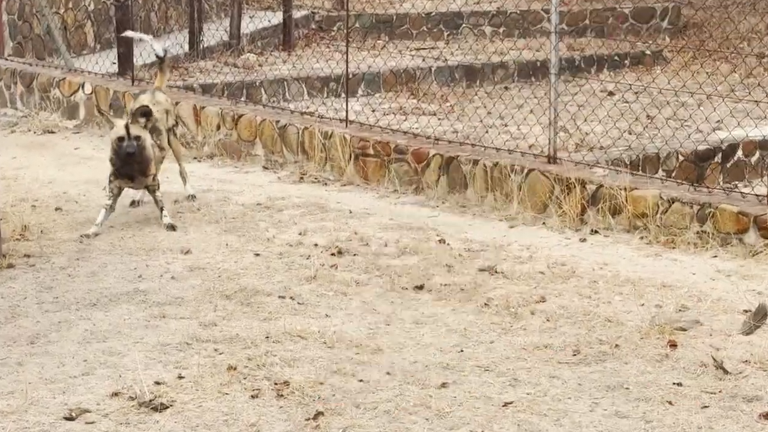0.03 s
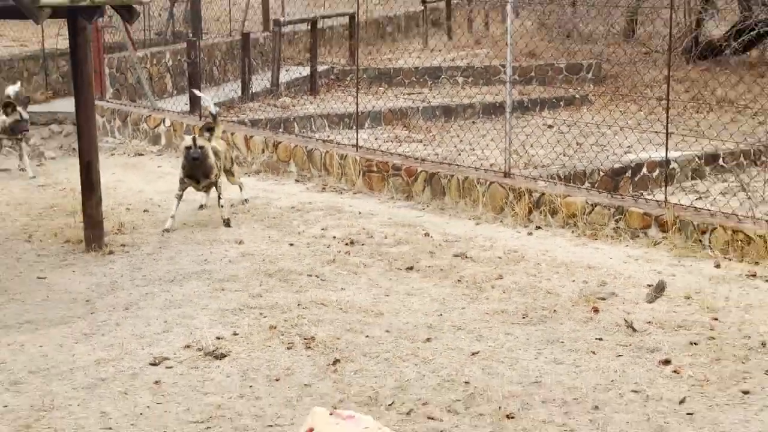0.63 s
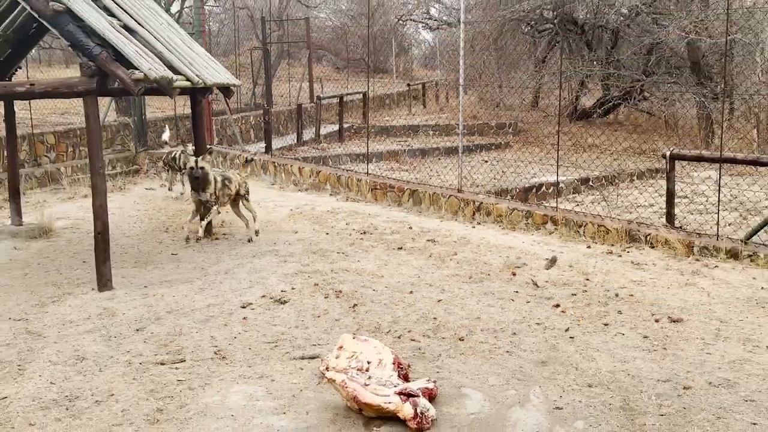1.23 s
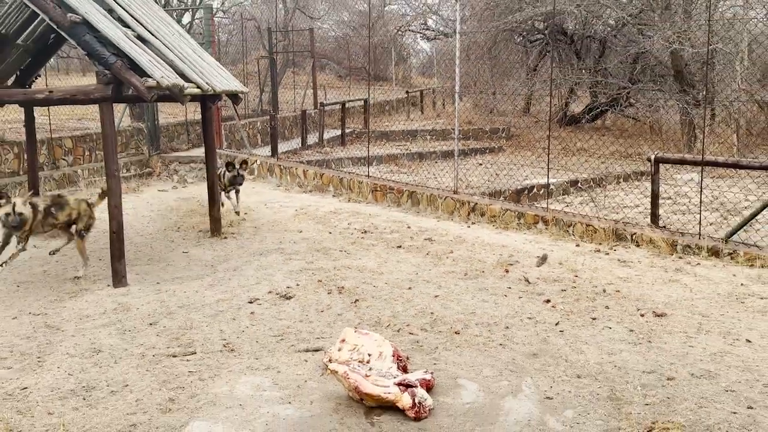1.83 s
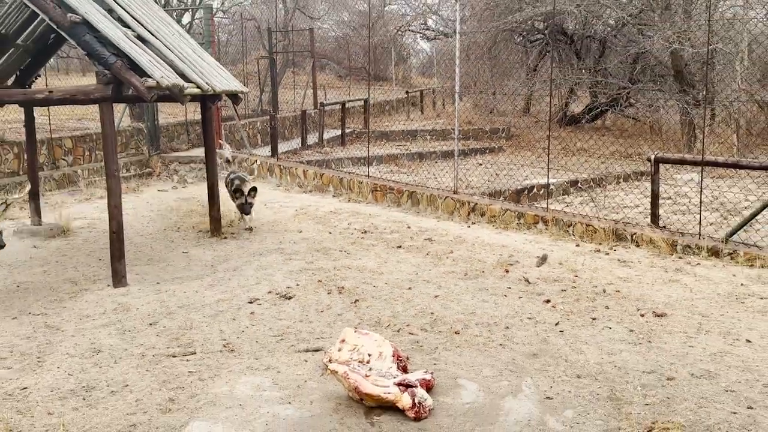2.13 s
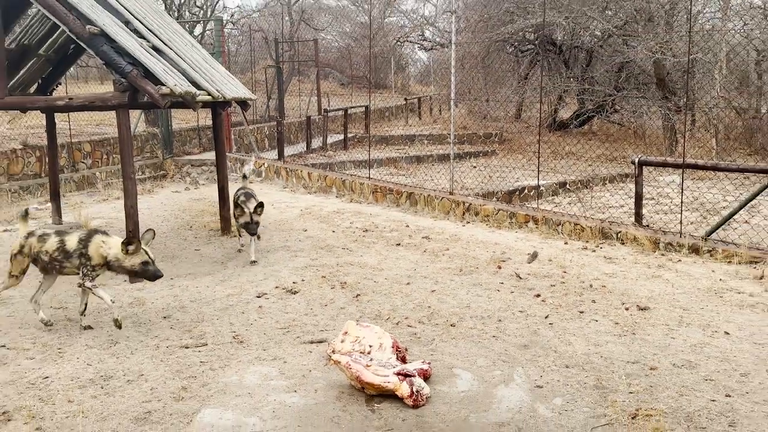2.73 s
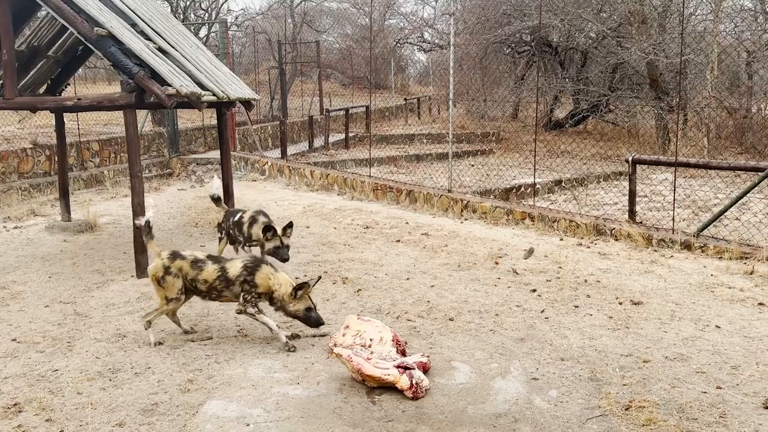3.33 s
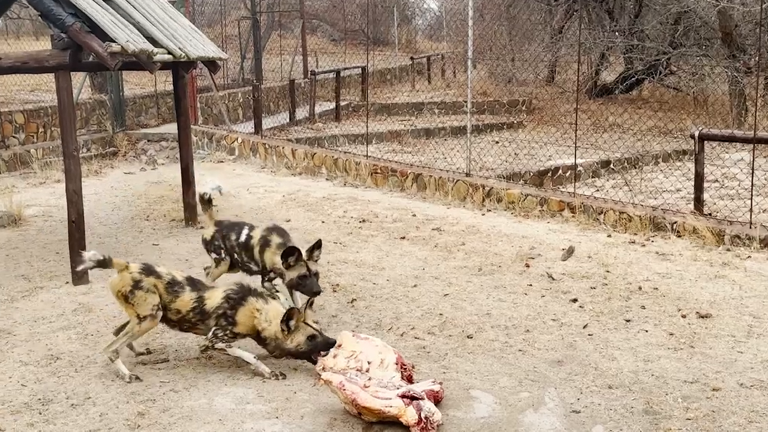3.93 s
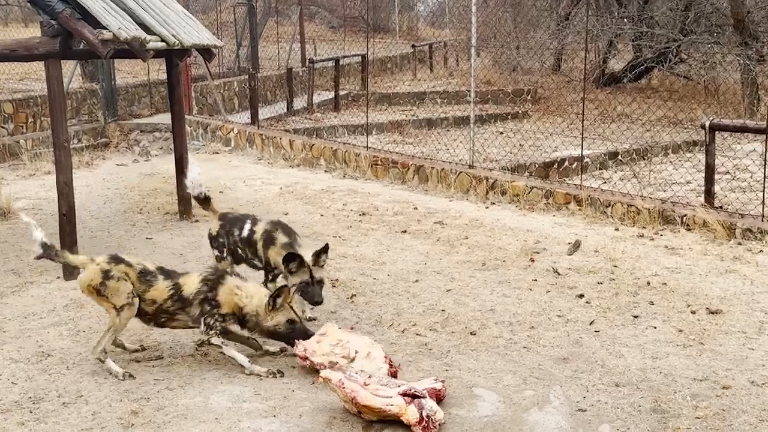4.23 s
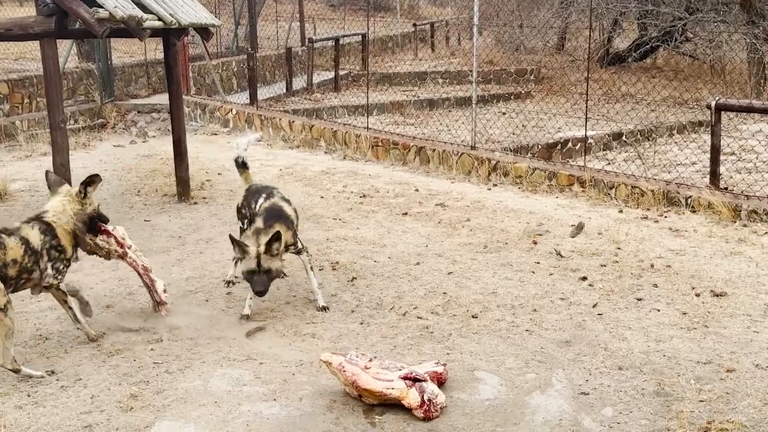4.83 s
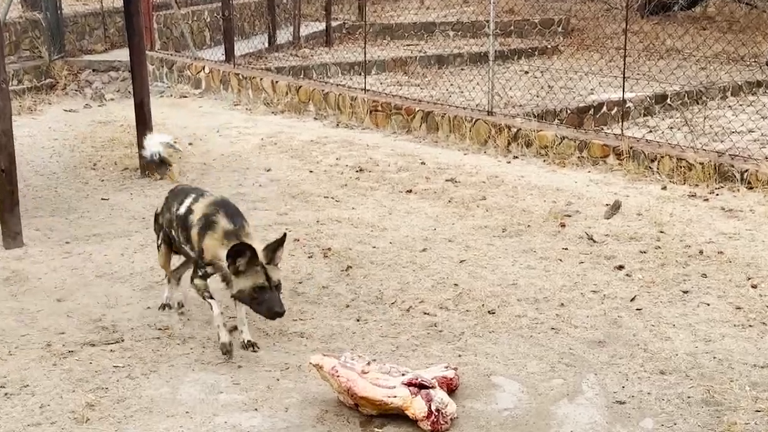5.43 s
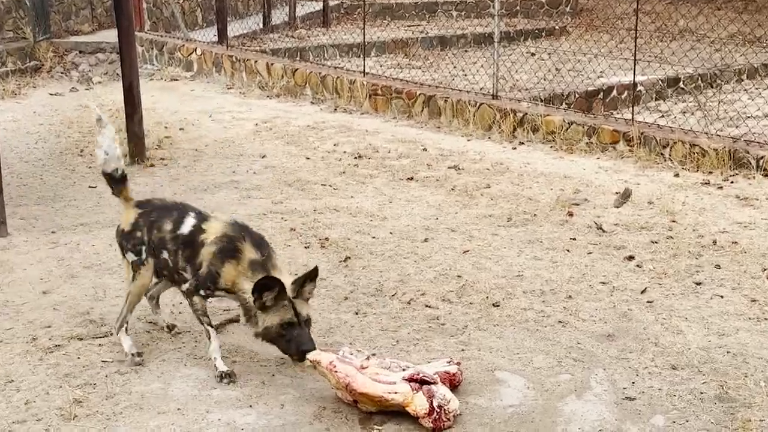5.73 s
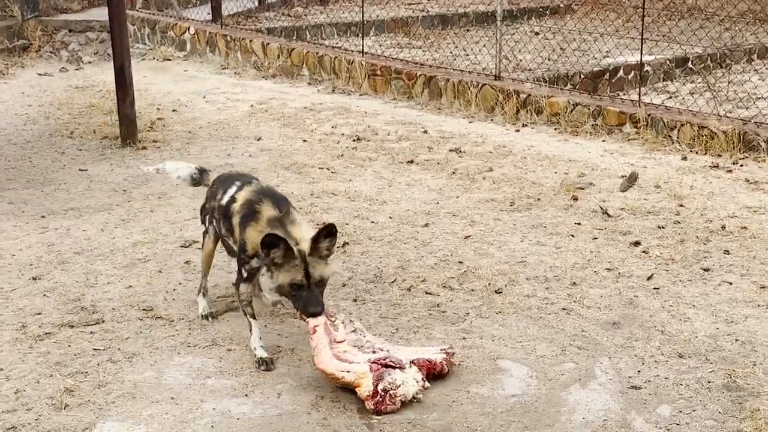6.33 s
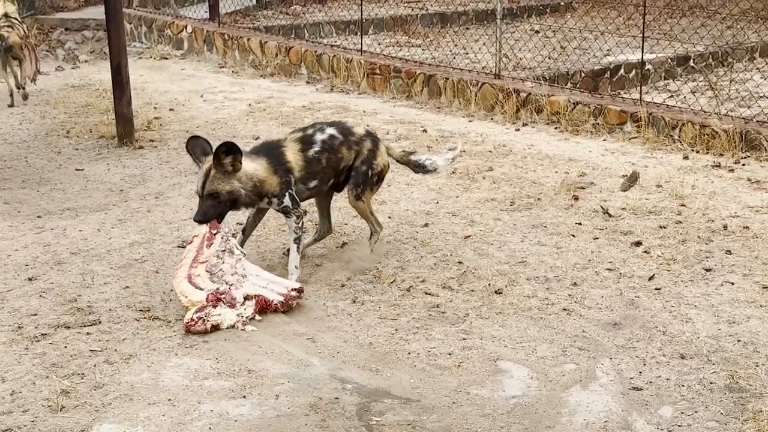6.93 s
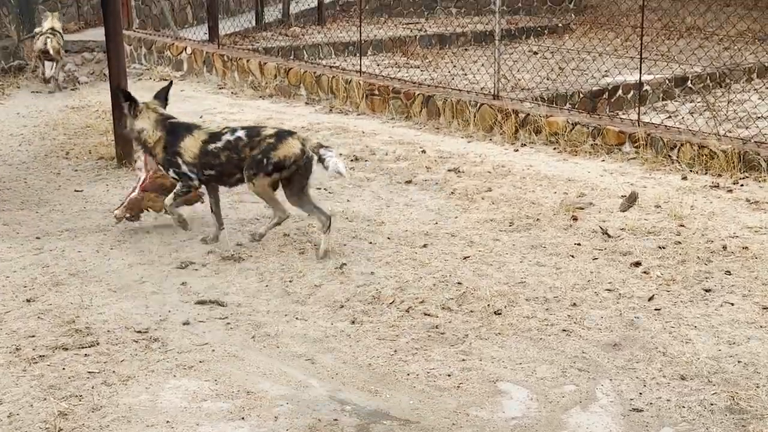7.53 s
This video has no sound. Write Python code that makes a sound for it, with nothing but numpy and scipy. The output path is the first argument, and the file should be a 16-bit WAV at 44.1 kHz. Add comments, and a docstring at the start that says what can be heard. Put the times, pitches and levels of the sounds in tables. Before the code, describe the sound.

In a sandy outdoor pen, wild dogs twitter in quick clusters of thin, very high, gliding chirps and wavering squeals, with one faint low yelp and a slight echo. The calls stop after about three seconds. Soft paw scuffs, hissing sand and small pebble clicks follow as meat is dragged twice over the ground. Wind rumbles and thumps on the hand-held microphone throughout, strongest at the start and the end.

```python
"""A sandy outdoor pen: African wild dogs trot up to a piece of meat, tug at it and drag it off.
They twitter in thin, gliding whistles, with one low yelp, and the pen echoes their calls.
Paws and meat scrape over the grit, making sand hiss and pebbles click. Gusts of wind rumble
and thump on a hand-held microphone, over a faint hush of open air."""
import sys
import numpy as np
from scipy import signal
from scipy.fft import rfft, irfft, next_fast_len
from scipy.io import wavfile
from scipy.ndimage import uniform_filter1d

SR = 44100
rng = np.random.default_rng(int(sys.argv[2]) if len(sys.argv) > 2 else 0)


def dump_mix(stems):
    """Bounce the given channels to the path in sys.argv[1] as a 16-bit WAV at rate SR."""
    frames = np.atleast_2d(stems).T  # one column per channel
    limited = np.clip(frames, -1, 1)  # hard clip at full scale
    pcm = np.round(limited * 32767).astype(np.int16)
    wavfile.write(sys.argv[1], SR, pcm)


N = 338247
TIME = np.arange(N) / SR
CUTOFF_HZ = 15700


def from_db(db):
    """Turn decibels into a number to multiply a sound by."""
    return 10 ** (np.asarray(db) / 20)


def rms_one(x):
    """Scale a signal so that its average size (rms) is 1."""
    return x / np.sqrt(np.mean(x ** 2) + 1e-20)


def in_time(rows):
    """Join timed points with straight lines: one curve for each column after the time."""
    times, *columns = np.transpose(rows)
    return [np.interp(TIME, times, column) for column in columns]


def at_hz(points, hz):
    """Read a table of (pitch, value) points at any pitch, with octaves evenly spaced."""
    pitches, values = np.transpose(points)
    return np.interp(np.log(hz), np.log(pitches), values)


def add(out, start_s, sound):
    """Mix a sound in at a given time."""
    start = int(start_s * SR)
    out[..., start:start + sound.shape[-1]] += sound[..., :N - start]


def drift(rate_hz):
    """A smooth random wobble of size about 1; a higher rate wobbles faster."""
    memory = np.exp(-40 * np.pi * rate_hz / SR)
    noise = rng.standard_normal(N // 20 + 2002)   # one value per 20 samples, plus a run-up
    slow = signal.lfilter([1], [1, -2 * memory, memory * memory], noise)[2000:]
    return np.interp(np.arange(N) / 20, np.arange(len(slow)), rms_one(slow))


def envelope(hold_s, attack_s, release_s):
    """A loudness shape that rises, holds, then dies away."""
    t = np.arange(0, attack_s + hold_s + 8 * release_s, 1 / SR)
    return np.minimum(t / attack_s, 1) * np.exp(-np.maximum(t - attack_s - hold_s, 0) / release_s)


def resonate(x, hz, width_hz):
    """Keep only the part of a sound near one pitch."""
    edges = np.clip([hz - width_hz / 2, hz + width_hz / 2], 30, SR * .45)
    return signal.sosfilt(signal.butter(2, edges, "band", fs=SR, output="sos"), x)


def noise_bands(spectrum):
    """Split stereo noise with a given tone into half-octave bands: (middle pitch, sound)."""
    # how alike left and right are (1 = the same): pitch_hz, likeness
    likeness = [(50, 0.68), (125, 0.67), (250, 0.98), (1000, 0.26), (2500, 0.95), (5000, 1), (8000, 0.96),
                (15000, 1)]
    edges = spectrum[0][0] * 2 ** np.arange(-.5, 11, .5)
    edges = edges[edges < min(spectrum[-1][0] * 2, SR / 2)]
    centres = np.sqrt(edges[1:] * edges[:-1])
    gains = from_db(at_hz(spectrum, centres))
    gains = gains / np.sqrt(np.sum(gains ** 2 * np.diff(edges)) / (SR / 2))
    white = rng.standard_normal((2, 2, N))
    for k, hz in enumerate(centres):
        band_filter = signal.butter(2, edges[k:k + 2], "band", fs=SR, output="sos")
        mid, side = signal.sosfilt(band_filter, white[k % 2])
        alike = np.clip(at_hz(likeness, hz), -1, 1)
        apart = np.sqrt((1 - alike) / 2) * np.array([side, -side])
        yield hz, gains[k] * (np.sqrt((1 + alike) / 2) * mid + apart)


def coloured(spectrum):
    """Stereo noise of size about 1; the spectrum sets only its balance of low and high."""
    return sum(band for hz, band in noise_bands(spectrum))


def swells(rows, gain_db, grain_db):
    """Patches of grainy noise, each swelling and fading around its own pitch."""
    out = np.zeros(N)
    grains = rms_one(from_db(grain_db * drift(120))) * rng.standard_normal(N)
    for middle_s, length_s, hz, width_hz, db in rows:
        start = max(int((middle_s - length_s / 2) * SR), 0)
        span = slice(start, int((middle_s + length_s / 2) * SR))
        swell = np.cos(np.pi * (TIME[span] - middle_s) / length_s)
        out[span] += from_db(db + gain_db) * swell * rms_one(resonate(grains[span], hz, width_hz))
    return out


def still_air(level_db):
    """The air around the pen makes a faint, steady hush."""
    # tone of the hush: pitch_hz, relative_db
    air_tone = [(30, -1), (75, -5), (250, -17), (600, -13), (1500, -25.5), (3900, -66), (8000, -28),
                (11000, -64), (15500, -54)]
    return from_db(level_db) * coloured(air_tone)


def wind_strength(attack_s, release_s):
    """How hard the wind blows at each moment, in dB: a breeze with gusts on top."""
    # the breeze between gusts: time_s, level_db
    breeze = [(0, -33.5), (1.1, -49), (1.27, -50.5), (1.4, -45), (1.72, -66), (1.95, -51), (2.28, -52.5),
              (2.6, -50.5), (2.75, -64), (3.55, -69), (4.1, -53), (4.7, -43), (5.35, -54), (5.65, -73),
              (6.0, -66), (6.4, -46.5), (7.0, -41.5), (7.67, -35)]
    # gusts on the microphone: start_s, length_s, level_db
    gusts = [(0.043, 0.18, -32), (0.298, 0.027, -30.5), (.43, 0.13, -32), (0.652, .12, -39.5),
             (.815, 0.075, -31.5), (0.874, 0.19, -39.5), (1.1, 0.021, -37.5), (1.524, 0.089, -45),
             (1.675, 0.0086, -47.5), (1.755, 0.02, -43.5), (1.9, 0.056, -50), (1.992, 0.046, -37),
             (2.196, .05, -47), (2.408, .12, -40.5), (2.581, 0.032, -41), (2.812, .02, -53.5),
             (3.157, 0.017, -49), (3.276, 0.022, -51), (3.645, 0.031, -47), (3.75, .28, -40.5),
             (4.165, 0.11, -36.5), (4.328, 0.14, -42), (4.834, 0.12, -34.5), (4.935, 0.096, -37),
             (5.114, .16, -41), (5.432, .03, -42.5), (5.539, 0.016, -45), (5.635, 0.014, -46.5),
             (5.72, 0.087, -59), (6.054, 0.019, -44.5), (6.212, 0.056, -37.5), (6.324, 0.4, -38.5),
             (6.81, 0.026, -38), (7.06, 0.49, -32.5)]
    power = from_db(in_time(breeze)[0]) ** 2
    for start_s, length_s, db in gusts:
        gust = from_db(db) * envelope(length_s, attack_s, release_s)
        add(power, max(start_s - attack_s, 0), gust ** 2)
    return 10 * np.log10(power)


def wind(strength_db, unrest_db, dull_db, lump_db, treble_lump_db):
    """Air swirls at the microphone's openings with a lumpy roar; light air only rumbles."""
    # tone of the wind: pitch_hz, relative_db
    wind_tone = [(20, -24.5), (35, -10), (55, 7), (80, 5), (130, 0.5), (220, -6), (400, -22), (600, -38.5),
                 (850, -64), (1300, -74)]
    calm = np.clip((-37 - strength_db) / 20, 0, 1)
    lumps = 2 * np.tanh(drift(35) / 2)
    roar = 0
    for hz, band in noise_bands(wind_tone):
        treble = np.clip(np.log2(hz / 100) / 2, 0, 1)
        roar += band * from_db((lump_db + treble_lump_db * treble) * lumps - dull_db * treble * calm)
    # even out the roar, so that its tone does not change its level
    power = uniform_filter1d(np.mean(roar ** 2, axis=0), size=3000)
    return from_db(strength_db + unrest_db * drift(10.2)) * roar / np.sqrt(power + 1e-12)


def eddy(start_hz, rise_s, end_hz, fall, turn, skew, churn=0.348):
    """One swirl of air (an eddy) thumps, getting deeper as it spreads over the microphone."""
    t = np.arange(int(SR / 10)) / SR
    knots = np.arange(0, t[-1], rise_s / 3)
    stir, shake = [np.interp(t, knots, row) for row in rng.standard_normal((2, len(knots)))]
    falling_hz = end_hz + (start_hz - end_hz) * np.exp(-t / (fall * rise_s))
    hz = falling_hz * np.exp(churn * (1.34 * np.tanh(stir) - churn))
    phase = 2 * np.pi * (np.cumsum(hz) / SR + turn)
    swell = (t / rise_s * np.exp(1 - t / rise_s)) ** 2 * (1 + churn * shake)
    return swell * np.sin(phase + 0.21 * skew * np.array([[1], [-1]]))   # skew parts left from right


def buffets(end_hz, fall):
    """Big eddies slap the microphone one by one."""
    # the slaps: start_s, level_db, start_hz, rise_s
    slaps = [(0.043, -23, 710, 0.0029), (.079, -24.5, 960, 0.0033), (0.129, -23, 403, 0.0061),
             (0.192, -30, 342, 0.0087), (0.298, -27, 246, 0.02), (.319, -32, 850, .0023),
             (0.339, -24, 880, 0.0027), (0.434, -19, 695, 0.0024), (0.458, -19.5, 685, 0.0018),
             (.521, -19, 760, 0.0013), (.546, -23, 655, .0031), (0.635, -31, 1030, 0.0036),
             (.664, -26, 805, 0.003), (0.769, -27.5, 686, .0014), (0.825, -30, 655, 0.0026),
             (1.03, -35.5, 705, .005), (2.482, -29, 438, 0.0053), (4.03, -33, 860, .003),
             (4.824, -30.5, 538, 0.0078), (4.87, -25, 596, 0.0021), (4.955, -26.5, 604, .0046),
             (6.217, -29.5, 516, .004), (6.23, -18, 513, .0085), (6.326, -26.5, 583, 0.0077),
             (6.619, -23, 576, 0.0058), (6.83, -22.5, 472, .01), (7.08, -20.5, 804, 0.0042),
             (7.084, -15.5, 389, .0095), (7.168, -24.5, 857, .0075), (7.212, -26.5, 747, 0.0067),
             (7.266, -26, 540, 0.0072), (7.309, -23, 295, 0.0065), (7.448, -25, 418, 0.016),
             (7.543, -20, 513, 0.0062), (7.62, -27.5, 620, 0.0042)]
    out = np.zeros((2, N))
    for start_s, db, start_hz, rise_s in slaps:
        turn, skew = rng.standard_normal(2)
        add(out, start_s, from_db(db) * eddy(start_hz, rise_s, end_hz, fall, turn, skew))
    return out


def flurry(strength_db, gain_db, growth, top_hz, rise_s, spread_db, count):
    """Small eddies pop at random, and grow faster than the gust that carries them."""
    out = np.zeros((2, N))
    for k, (when, size, turn, skew, force) in enumerate(rng.random((count, 5))):
        start_s = (k + when) / count * (N - 1) / SR
        gust_db = strength_db[int(start_s * SR)]
        db = gust_db + gain_db + growth * min(gust_db + 35.5, 0) + spread_db * (force - .5)
        pop = eddy(top_hz * (1 - size / 2), rise_s * (1 + size),
                   end_hz=120, fall=1.85, turn=turn, skew=4 * skew - 2)
        add(out, start_s, from_db(db) * pop)
    return out


def friction(attack_s, release_s):
    """How strong the scrape and the sandy hiss are: trotting, dragging and short bursts together."""
    # grit stirring under trotting paws: time_s, scrape_db, sand_db
    patter = [(0, -50.5, -54.5), (.3, -69, -67), (1.1, -62, -61.5), (1.65, -69, -66.5), (2.1, -65.5, -62),
              (2.88, -69.5, -70), (3.2, -64.5, -62.5), (3.52, -68.5, -62), (5.2, -64, -62), (6.0, -70, -63),
              (7.67, -63, -62.5)]
    # the meat is dragged twice, one list each: time_s, scrape_db, sand_db
    hauls = [
        [(3.7, -63, -72), (3.82, -53.5, -65), (4.06, -60, -88), (4.33, -47.5, -57.5), (4.5, -48.5, -53.5),
         (4.63, -59.5, -61), (4.9, -70, -61), (5.2, -80, -85)],
        [(6.12, -65, -61), (6.22, -54.5, -57), (6.3, -57, -54.5), (6.42, -55, -49.5), (6.58, -60, -54),
         (6.69, -53, -47), (6.85, -59, -64), (7.05, -58.5, -57), (7.25, -104, -65)],
    ]
    # short bursts, from skids or from breath during the calls: start_s, length_s, scrape_db, hiss_db
    bursts = [(0, 0.11, -50.5, -59), (0.553, 0.15, -53, -52.5), (1.351, 0.075, -53.5, -64),
              (1.753, 0.013, -63, -51.5), (1.87, 0.097, -55, -54.5), (1.988, 0.043, -57.5, -57),
              (2.175, 0.036, -61.5, -58), (2.335, 0.016, -60, -55), (3.014, 0.11, -58, -64.5),
              (3.243, 0.032, -73, -64), (3.397, 0.057, -54.5, -50.5), (3.586, 0.046, -56.5, -51.5),
              (3.718, 0.036, -56.5, -52), (4.111, 0.022, -50.5, -57), (4.421, 0.014, -47, -47),
              (4.482, 0.057, -48, -61), (4.665, 0.022, -54.5, -61), (4.745, 0.09, -54.5, -52),
              (5.114, .015, -59.5, -70), (5.332, 0.055, -58.5, -63.5), (5.515, 0.083, -54.5, -50),
              (5.666, 0.096, -63.5, -61), (5.853, 0.0095, -56, -59), (5.935, 0.061, -60, -65),
              (6.046, 0.014, -56.5, -55.5), (6.178, 0.032, -69, -45.5), (6.471, 0.013, -49.5, -45),
              (6.509, 0.014, -55, -40.5), (7.398, 0.023, -59, -56), (7.49, 0.021, -61, -54),
              (7.557, 0.0057, -56, -58)]
    power = from_db(in_time(patter)) ** 2
    for haul in hauls:
        dragging = (TIME > haul[0][0]) & (TIME < haul[-1][0])
        power += from_db(in_time(haul)) ** 2 * dragging
    for start_s, length_s, scrape_db, hiss_db in bursts:
        burst = from_db([[scrape_db], [hiss_db]]) * envelope(length_s, attack_s, release_s)
        add(power, max(start_s - attack_s, 0), burst ** 2)
    return np.sqrt(power)


def grit(per_s, spread_db, hz, width_hz):
    """Coarse grains crack at random, most of them small and a few large."""
    sizes = from_db(spread_db * np.minimum(rng.exponential(1, N), 4)) * rng.choice([-1, 1], N)
    cracks = sizes * (rng.random(N) < per_s / SR)
    return rms_one(resonate(cracks + 1e-18, hz, width_hz))


def scuffs(slip_db, grain_db, crunch_db):
    """Paws and meat stick, slip and crunch as sand tumbles; the same noise serves for puffs of breath."""
    # tone of scraped ground: pitch_hz, relative_db
    scrape_tone = [(250, 10), (600, 6), (1000, 5.5), (1600, 3.5), (2400, 0.5), (3500, -1), (6000, -14.5),
                   (9000, -21), (15000, -19.5)]
    # tone of loose sand: pitch_hz, relative_db
    sand_tone = [(1500, -15), (3000, -5.5), (5500, 0), (8000, 1), (11000, -0.5), (15000, 1)]
    scrape_level, sand_level = friction(attack_s=0.014, release_s=0.018)
    slips = slip_db * drift(20)
    scrape = coloured(scrape_tone) * rms_one(from_db(slips + grain_db / 2 * drift(350)))
    sand = coloured(sand_tone) * rms_one(from_db(slips + grain_db * drift(570)))
    crunch = from_db(crunch_db) * grit(per_s=260, spread_db=5.0, hz=2970, width_hz=4000)
    return scrape_level * (scrape + crunch) + sand_level * sand


def rubs():
    """Harder rubs and faint squeaks each ring around a pitch of their own."""
    # the rubs: middle_s, length_s, pitch_hz, width_hz, relative_db
    strokes = [(0.023, 0.12, 2020, 1280, -40), (3.686, 0.084, 1160, 250, -54.5),
               (4.134, 0.13, 1840, 920, -46), (4.207, 0.089, 1820, 700, -55), (4.384, 0.1, 830, 440, -43),
               (4.374, 0.13, 1460, 885, -43), (4.51, 0.17, 1190, 915, -45), (5.578, 0.085, 3300, 700, -46),
               (5.855, .025, 586, 500, -47.5), (5.92, 0.16, 1060, 400, -56.5), (6.62, 1, 1680, 785, -54.5),
               (6.602, 0.86, 3800, 2400, -54), (7.4, 0.044, 5170, 500, -55),
               (7.598, 0.032, 1130, 200, -52.5)]
    return swells(strokes, gain_db=-3, grain_db=5.5)


def pebbles(decay_s):
    """A kicked pebble clicks: a very short burst of noise around the pitch it rings at."""
    # pebbles and grit kicked up: start_s, peak_db, pitch_hz
    kicks = [(0.287, -46, 2080), (.456, -44.5, 1480), (1.2274, -38, 4190), (2.016, -48, 1600),
             (2.58, -37, 8140), (2.607, -42.5, 7850), (3.3962, -37.5, 6240), (3.734, -44, 3300),
             (4.124, -27.5, 1750), (4.4864, -26, 1310), (4.6698, -36.5, 1200), (5.5893, -36.5, 3330),
             (5.7528, -35.5, 6700), (5.7768, -35.5, 8550), (5.9696, -40.5, 6260), (6.0417, -45, 3380),
             (6.1997, -36, 5220), (6.4507, -36, 4200), (7.565, -38.5, 1190)]
    out, t = np.zeros(N), np.arange(int(SR / 20)) / SR
    for start_s, db, hz in kicks:
        burst = rng.standard_normal(len(t)) * np.exp(-t / decay_s)
        ring = signal.butter(1, [hz / 2, min(hz * 2, CUTOFF_HZ)], "band", fs=SR, output="sos")
        click = signal.sosfilt(ring, burst)
        add(out, start_s, from_db(db) * click / np.abs(click).max())
    return out


def pen_echo(sound, tail_db, fade_60db_s, early_db, early_s):
    """Ground, walls and bushes scatter a quick echo and a thin, longer tail."""
    t = np.arange(int(.7 * SR)) / SR
    decay = from_db(tail_db - 60 * t / fade_60db_s) + from_db(early_db) * np.exp(-t / early_s)
    mid, side = rng.standard_normal((2, len(t))) * decay * (t > .004) / np.sqrt(SR * .03)
    echoes = np.array([mid + 0.51 * side, mid - 0.51 * side])
    return signal.fftconvolve(np.atleast_2d(sound), echoes, axes=1)[:, :N]


def rasps():
    """The dogs' voices rasp huskily beneath their whistles."""
    # the rasps: middle_s, length_s, pitch_hz, width_hz, relative_db
    husky_notes = [(.57, 0.083, 1550, 600, -52), (.635, 0.025, 1340, 400, -48),
                   (.69, 0.075, 1530, 448, -46.5), (.79, .08, 1490, 500, -52.5),
                   (.985, 0.18, 1410, 448, -53), (1.37, 0.2, 1280, 616, -52.5),
                   (1.85, 0.054, 1500, 1200, -61), (2.39, 0.039, 1840, 1154, -49),
                   (2.51, 0.13, 1560, 460, -52), (3.07, 0.32, 1240, 1100, -65)]
    return swells(husky_notes, gain_db=-1.5, grain_db=4)


def voicing(length_s, edge_s):
    """The clock of one call, and a gate that opens and closes it softly."""
    t = np.arange(-edge_s / 2, length_s + edge_s / 2, 1 / SR)
    opening = np.clip(np.minimum(t - t[0], t[-1] - t) / edge_s, 0, 1)
    return t, np.sin(np.pi / 2 * opening) ** 2


def yelp(jitter):
    """One short, low, rising note whose overtones are shaped by the throat."""
    # path of the yelp: time_s, pitch_hz, level_db
    path = [(1.862, 391, -50), (1.878, 414, -47), (1.895, 480, -47.5), (1.912, 516, -42),
            (1.925, 590, -48.5), (1.936, 600, -54)]
    # how the throat and open mouth boost or weaken each pitch: pitch_hz, gain_db
    throat = [(400, -2.5), (600, 0.5), (1000, -12), (1550, -3), (2050, -2), (2600, -25), (4000, -31)]
    times, pitches, levels_db = np.transpose(path)
    t, gate = voicing(times[-1] - times[0], edge_s=0.0064)
    t = t + times[0]
    hz = uniform_filter1d(np.interp(t, times, pitches), size=200)
    level = gate * from_db(np.interp(t, times, levels_db))
    phase = 2 * np.pi * np.cumsum(hz * (1 + jitter * drift(196.5)[:len(hz)])) / SR
    voice = sum(from_db(at_hz(throat, k * hz)) * np.sin(k * phase) for k in range(1, 8))
    out = np.zeros(N)
    add(out, t[0], level * voice)
    return out


def chirps(settle):
    """Start, pitch and level of each chirp: most shoot up, round off and settle lower."""
    # the chirps: start_s, rise_s, fall_s, first_hz, top_hz, last_hz, first_db, top_db, last_db
    arches = [(0.507, 0.04, .022, 6600, 8270, 6100, -51, -52.5, -44),
              (.57, .02, .02, 6200, 6870, 6500, -49, -51, -50),
              (0.612, 0.021, 0.0087, 6300, 7100, 6930, -45, -40, -30),
              (.645, .013, 0.012, 4860, 6000, 6000, -44, -49, -44),
              (.664, 0.0026, 0.011, 7080, 6900, 5880, -47, -41, -33),
              (0.68, 0.0078, 0.039, 5970, 6930, 4420, -27, -39, -39.5),
              (.736, .016, 0.0032, 6630, 7950, 7850, -30, -32, -46),
              (.76, .014, 0.0338, 7860, 8540, 7930, -31.5, -27.5, -43),
              (0.921, 0.023, 0.0036, 5600, 7860, 8000, -41, -43, -41),
              (0.949, .003, 0.024, 8880, 8970, 8080, -33, -30, -33),
              (.975, 0.019, 0.0034, 7880, 8080, 8140, -31.5, -37, -36),
              (1.304, 0.0066, 0.0015, 6450, 7370, 7500, -48, -36, -35),
              (1.311, .019, .027, 7480, 8450, 7720, -27.5, -32.5, -28),
              (1.634, 0.013, 0.0035, 6200, 7600, 8000, -59, -63, -57),
              (1.801, .006, 0.0091, 6500, 6600, 6570, -51, -48, -44.5),
              (1.823, 0.0182, .028, 6600, 7840, 7050, -43, -39, -22),
              (1.874, 0.014, .003, 7100, 7840, 8000, -35.5, -44, -43),
              (1.912, 0.0074, 0.03, 6900, 6750, 5320, -41.5, -39, -34.5),
              (2.404, 0.01, .002, 4300, 6500, 6500, -40.5, -47, -44),
              (2.438, 0.024, 0.028, 6300, 7900, 5900, -49, -46, -35),
              (2.486, 0.014, .002, 5900, 7130, 7350, -38, -47, -48),
              (3.015, 0.0065, .002, 4570, 5240, 5350, -44, -54, -67)]
    for start_s, rise_s, fall_s, first_hz, top_hz, last_hz, *levels_db in arches:
        t, gate = voicing(rise_s + fall_s, edge_s=0.0065)
        up = np.sin(np.pi / 2 * np.clip(t / rise_s, 0, 1))
        down = np.sin(np.pi / 2 * np.clip((t - rise_s) / fall_s, 0, 1) ** settle) ** 2
        hz = first_hz + (top_hz - first_hz) * up + (last_hz - top_hz) * down
        db = np.interp(t, [0, rise_s, rise_s + fall_s], levels_db)
        yield start_s + t[0], hz, gate * from_db(db)


def squeals(waver_hz, waver_db):
    """Start, pitch and level of each squeal: it drops to a held note and swells on every waver."""
    # the squeals: start_s, length_s, first_hz, held_hz, slide_s, wavers_per_s, first_db, last_db
    slides = [(1.09, 0.037, 6200, 4920, 0.0072, 30.6, -48.5, -35.5),
              (1.126, 0.19, 4960, 4230, .013, 14.9, -39, -43.5),
              (2.326, 0.033, 5910, 4420, .005, 28, -43.5, -35),
              (2.36, 0.042, 4190, 3993, .006, 24.2, -49, -29.5),
              (2.99, 0.023, 6220, 4510, 0.011, 14, -53, -37.5)]
    for start_s, length_s, first_hz, held_hz, slide_s, wavers_per_s, *levels_db in slides:
        t, gate = voicing(length_s, edge_s=0.008)
        waver = np.cos(2 * np.pi * wavers_per_s * t)
        held = held_hz + waver_hz * waver
        hz = held + (first_hz - held) * np.exp(-np.maximum(t, 0) / slide_s)
        db = np.interp(t, [0, length_s], levels_db) + waver_db * waver
        yield start_s + t[0], hz, gate * from_db(db)


def twitters(husk, jitter, flutter_db, tremble_db, octave_db, third_db, hiss_db, crackle_db, breath_db):
    """Chirps and squeals run together as near-pure whistles, rougher and airier the higher they go."""
    # tone of the air forced out with each call: pitch_hz, relative_db
    breath_tone = [(400, 5.5), (1500, 1), (2800, -2), (5500, -3.5), (9000, -0.5), (15000, -7.5)]
    # tone of the bright hiss that follows each call's loudness: pitch_hz, relative_db
    hiss_tone = [(900, -12.0), (1600, -7.5), (2800, -44.0), (6000, 18.5), (9000, -2), (15000, 16.0)]
    whistles, effort, airflow = np.zeros((3, N))
    wobble, flutter, crackle, overtone, tremble = [drift(hz) for hz in (430, 117, 900, 100, 45)]
    for start_s, hz, level in [*chirps(settle=.8), *squeals(waver_hz=144, waver_db=2)]:
        span = slice(int(start_s * SR), int(start_s * SR) + len(hz))
        strain = hz / 7000
        phase = 2 * np.pi * np.cumsum(hz * (1 + jitter * strain * wobble[span])) / SR
        # the octave comes and goes, and changes less with effort than the main note
        octave = from_db(octave_db + 4.1 * overtone[span]) * np.sqrt(level) * np.sin(2 * phase)
        # only low notes carry a tone at three times their pitch
        third = from_db(third_db) * level * np.clip((5000 - hz) / 500, 0, 1) * np.sin(3 * phase)
        husky = 1 + husk * np.clip(1 - level / from_db(-34.5), 0, 1)   # soft notes break up more
        shake = from_db(flutter_db * strain * flutter[span] + tremble_db * tremble[span])
        rough = 1 + from_db(crackle_db) * strain * husky * crackle[span]
        add(whistles, start_s, np.sqrt(2) * shake * rough * (level * np.sin(phase) + octave + third))
        add(effort, start_s, level)
        add(airflow, start_s, level ** 0.4 * strain ** 2)
    hiss = from_db(hiss_db) * effort * coloured(hiss_tone)
    breath = from_db(breath_db) * airflow * coloured(breath_tone)
    return whistles + hiss + breath


def scene():
    """Mix the dogs' calls and scuffing with the wind and the open air."""
    voices = twitters(husk=2.2, jitter=0.013, flutter_db=3.5, tremble_db=1.5, octave_db=-33.5,
                      third_db=-28.5, hiss_db=-21.5, crackle_db=-20.5, breath_db=-39)
    voices += yelp(jitter=0.014) + rasps()
    voices = voices + pen_echo(voices, tail_db=-22, fade_60db_s=0.55, early_db=-6.5, early_s=.016)
    ground = rubs() + scuffs(slip_db=2, grain_db=2.0, crunch_db=-11) + pebbles(decay_s=0.0031)
    dogs = (voices + ground) * from_db([[0.2], [-0.2]])   # a touch to the left
    strength_db = wind_strength(attack_s=0.037, release_s=0.027)
    eddies = buffets(end_hz=100.3, fall=1.16)
    eddies += flurry(strength_db, gain_db=-5.5, growth=0.87, top_hz=898, rise_s=.003,
                     spread_db=1.0, count=420)
    thumps = signal.sosfilt(signal.butter(7, 830, fs=SR, output="sos"), eddies)   # keep them dull
    roar = wind(strength_db, unrest_db=2.0, dull_db=41, lump_db=3.0, treble_lump_db=-0.5)
    return dogs + roar + thumps + still_air(level_db=-60.5)


def record(dry):
    """Left and right are out of step, most of all in the treble; deep bass and top treble are cut."""
    # how far the left side runs ahead of the right: pitch_hz, lead_radians
    left_lead = [(0, 0), (250, -.45), (600, -.45), (1200, 0), (2800, .15), (3800, .5), (4600, .35),
                 (6300, 0), (7000, -.35), (7700, -.1), (8450, 0), (8900, -1.3), (9550, -3.14),
                 (11100, -6.28), (12650, -9.42), (14150, -12.57), (15600, -15.7)]
    size = next_fast_len(N + SR // 10)
    lead = np.interp(np.arange(size // 2 + 1) * SR / size, *np.transpose(left_lead))
    shifted = irfft(rfft(dry, size) * np.exp(.5j * np.array([lead, -lead])), size)[:, :N]
    bass_cut = signal.sosfilt(signal.butter(3, 36, "high", fs=SR, output="sos"), shifted)
    return signal.sosfilt(signal.ellip(10, .1, 80, CUTOFF_HZ, fs=SR, output="sos"), bass_cut)


dry = scene()
out = record(dry)
dump_mix(out)
```